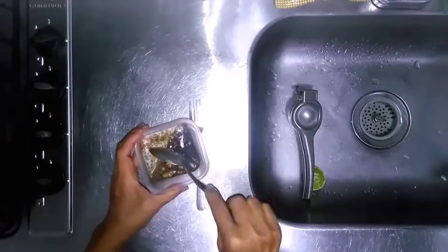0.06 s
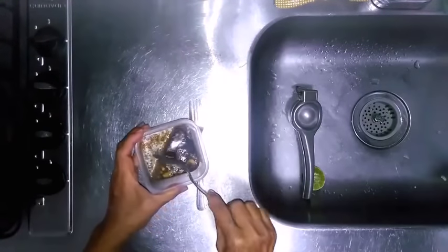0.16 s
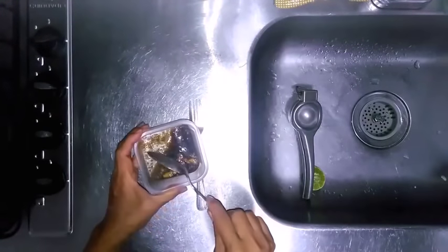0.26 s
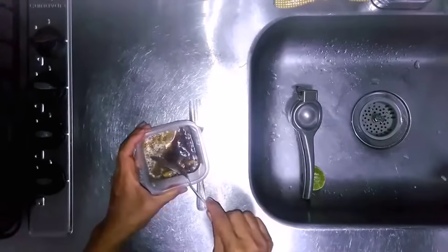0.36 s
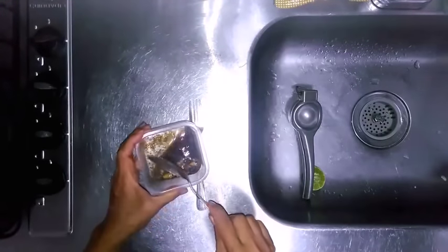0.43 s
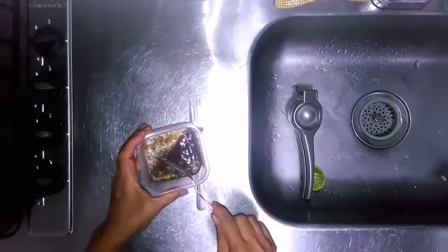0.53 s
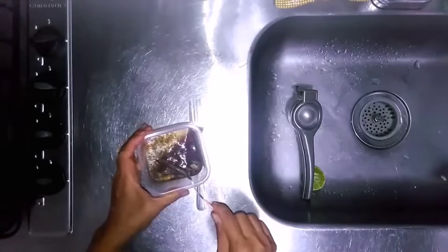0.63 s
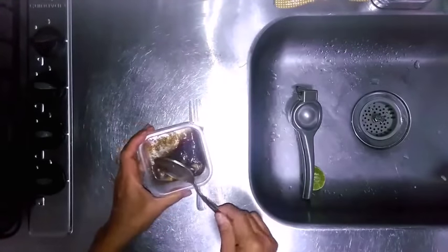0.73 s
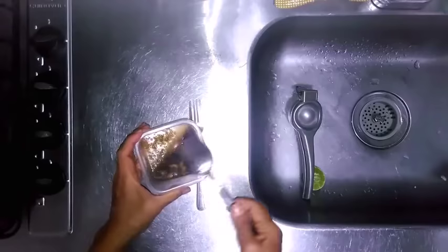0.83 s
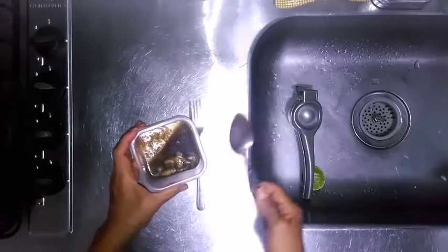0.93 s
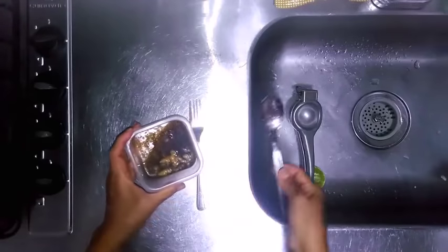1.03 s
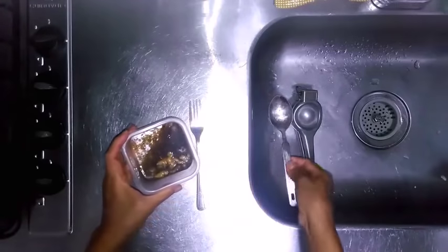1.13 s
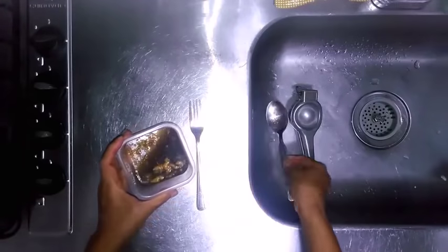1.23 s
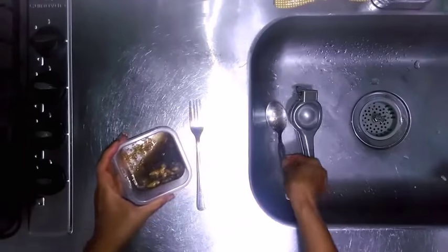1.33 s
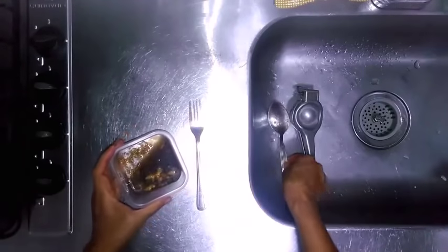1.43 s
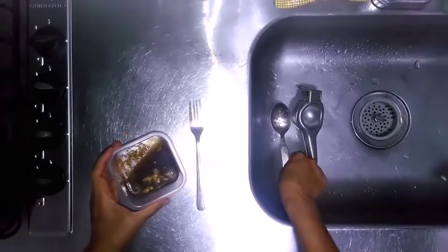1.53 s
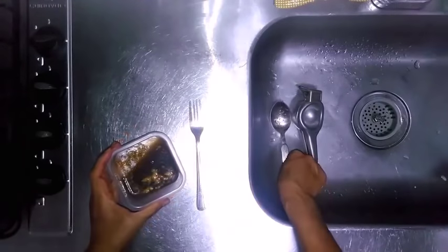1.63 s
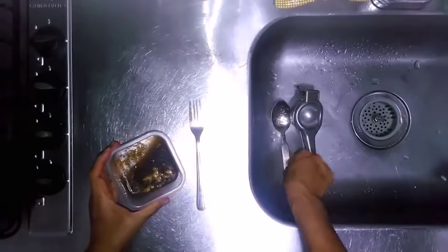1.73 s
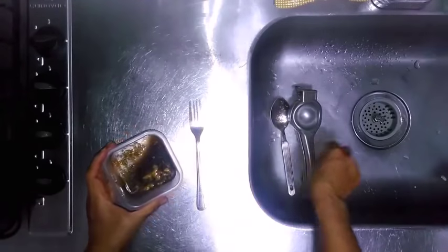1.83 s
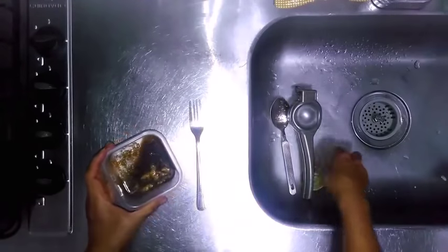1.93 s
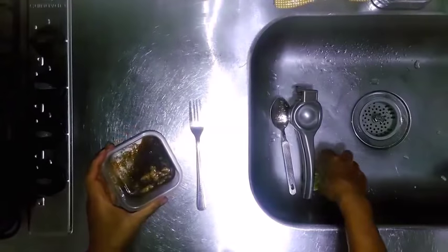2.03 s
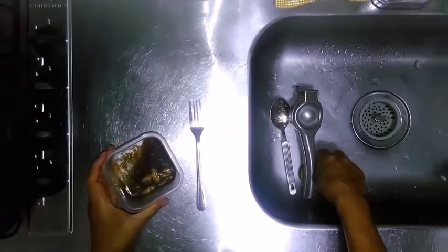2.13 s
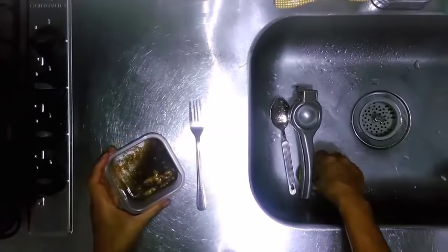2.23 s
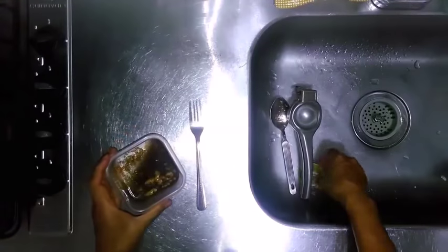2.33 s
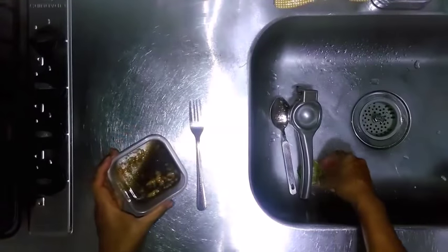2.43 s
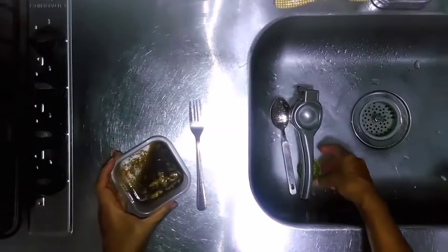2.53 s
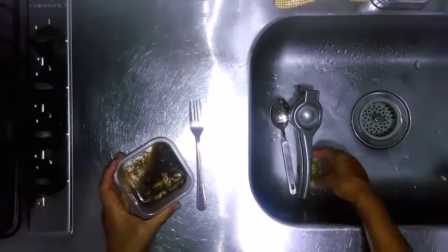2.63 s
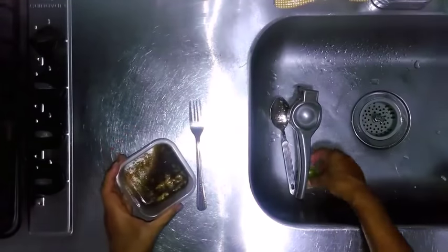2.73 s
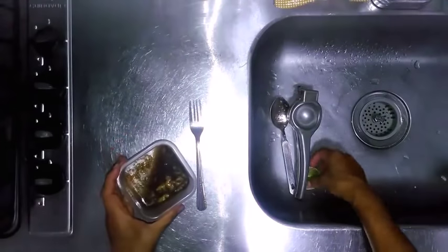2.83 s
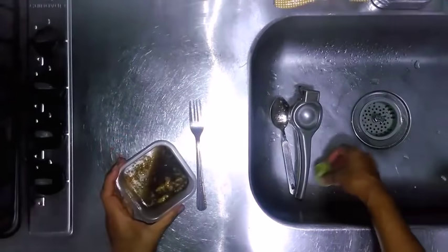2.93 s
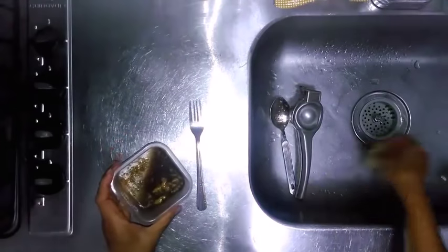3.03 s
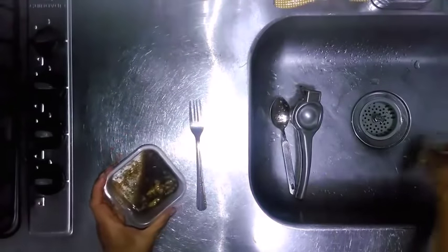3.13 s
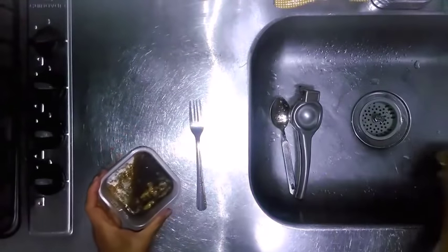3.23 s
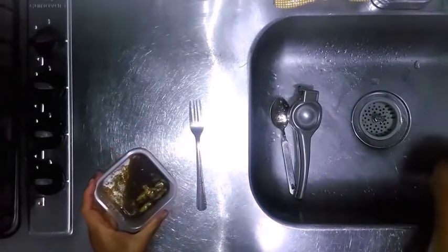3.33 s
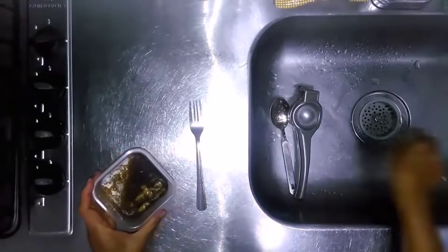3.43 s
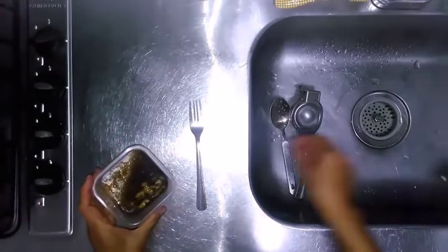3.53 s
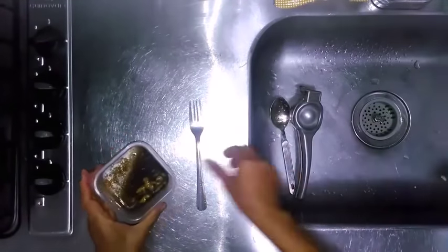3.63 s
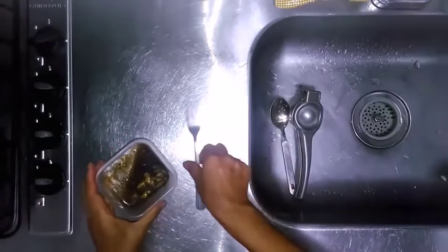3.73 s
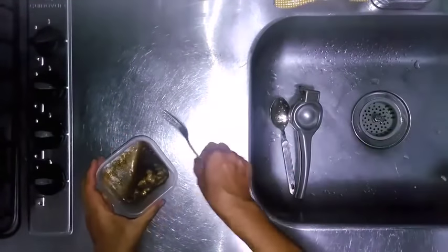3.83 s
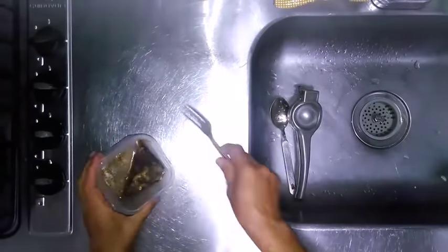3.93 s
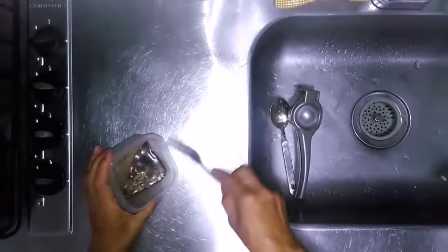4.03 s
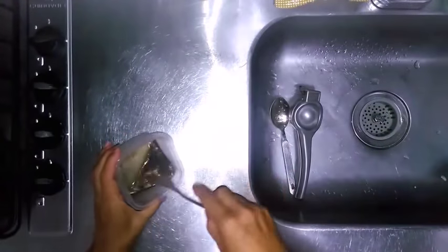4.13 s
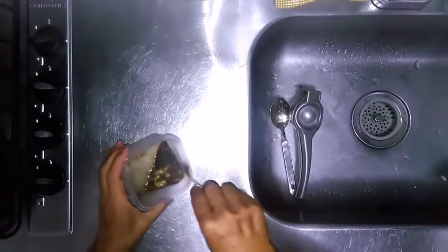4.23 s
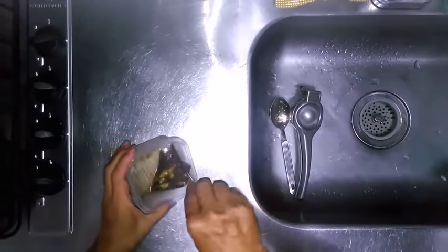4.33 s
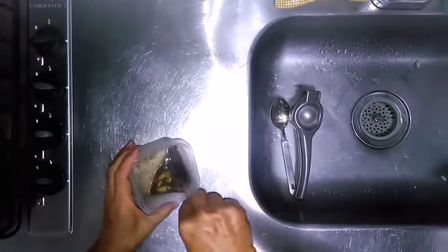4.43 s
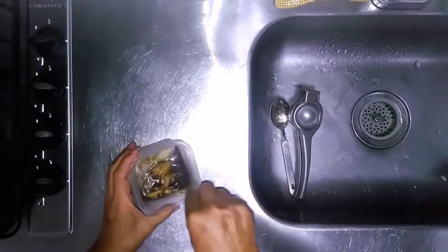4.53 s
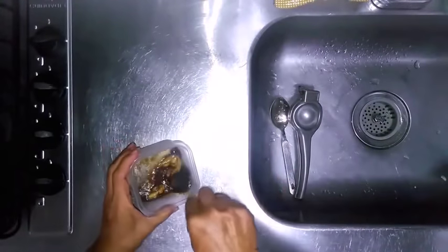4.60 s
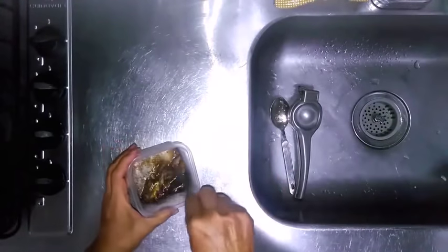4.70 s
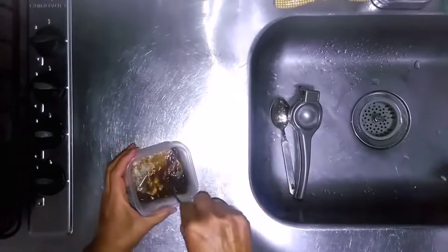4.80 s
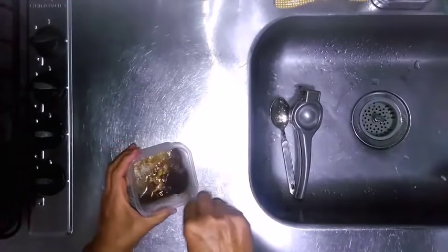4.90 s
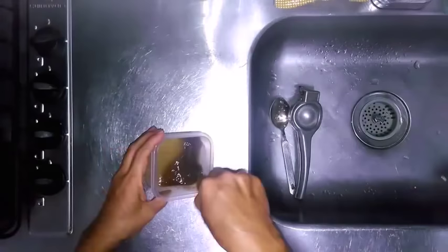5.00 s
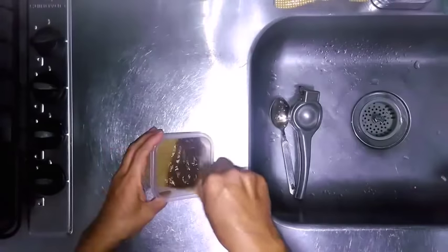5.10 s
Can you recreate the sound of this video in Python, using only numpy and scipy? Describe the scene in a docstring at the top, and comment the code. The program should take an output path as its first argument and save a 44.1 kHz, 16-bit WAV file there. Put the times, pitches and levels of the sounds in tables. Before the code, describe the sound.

Four taps on plastic, a metal spoon dropping into a sink, soft thuds, and a fork stirring dressing with clicks and wet crackle.

```python
"""Dressing at a steel sink

A spoon is tapped clean on a plastic tub's rim and clatters into the basin. A hand fishes out a lime
rind, bumps the steel and tosses the rind to the sink's far side. A fork rasps off the counter and stirs
the tub with clicks and wet crackle. Each hit or scrape is noise coloured by the body it excites. The
tiled room rings briefly over a low rumble; the microphone's two channels have opposite polarity."""
import sys
import numpy as np
from scipy import signal
from scipy.fft import rfft, irfft, next_fast_len
from scipy.io import wavfile
from scipy.ndimage import uniform_filter1d, map_coordinates

SR = 44100
rng = np.random.default_rng(int(sys.argv[2]) if len(sys.argv) > 2 else 0)


def wav_record(signal):
    """Record a signal, one row per channel, as 16-bit PCM in the file named by sys.argv[1]."""
    frames = np.transpose(np.atleast_2d(signal))
    bounded = np.clip(frames, -1, 1)
    # unit amplitude maps onto the largest positive 16-bit level
    quanta = np.round(bounded * 32767).astype(np.int16)
    wavfile.write(sys.argv[1], SR, quanta)


N = 227497
TIME = np.arange(N) / SR
AFTER = np.arange(SR // 2) / SR  # time since a contact
TOP_HZ = 14500

# Cue levels are relative within each layer.
# spoon on the tub's rim: (time [s], level [dB], chatter t60 [s], tilt [dB/octave], wall ring [dB])
SPOON_TAPS = [(.283, -11, 0.075, 0.7, -6), (.453, -5.5, 0.032, 0.7, 0), (.6175, -2.5, 0.028, 1.0, 4.5),
              (.759, 0, 0.026, 1.57, 3.5)]
# spoon bouncing in the sink: (time [s], level [dB], chatter t60 [s], tilt [dB/octave], floor clank [dB])
SPOON_BOUNCES = [(1.455, -6.5, 0.044, -0.9, 4), (1.471, -8.5, 0.041, -1.4, 6),
                 (1.482, -12.5, 0.033, -3.7, 9), (1.513, -12, 0.048, -2.2, -0.5),
                 (1.524, -18, 0.036, -1.5, 0), (1.617, 3.5, 0.024, -0.12, -17.5),
                 (1.626, -3.5, 0.013, -1, -15.5)]
# hand and squeezer on basin and counter: (time [s], level [dB], chatter t60 [s], tilt [dB/octave])
HAND_BUMPS = [(2.127, -39.5, 0.19, -2.5), (2.222, -41, 0.26, -4.5), (2.32, -50, 0.93, -1.7),
              (2.574, -16.5, 0.11, -2), (2.583, -11, 0.039, -1), (2.735, -47, 0.91, -1),
              (2.905, -42, 0.22, -2.5), (3.775, -46, 0.14, -1.5)]
# rind tumbling into the far side of the sink:
# (time [s], level [dB], chatter t60 [s], tilt [dB/octave], boom [dB])
RIND_THUDS = [(3.320, -18, 0.021, -1, 13), (3.428, -15.5, 0.045, -0.5, -3), (3.447, -22.5, 0.048, 6, -2),
              (3.513, -23, 0.11, 2.5, 7), (3.566, -17, 0.03, 2, -12)]
# fork on the tub's wall: (time [s], level [dB], chatter t60 [s], tilt [dB/octave], wall ring [dB])
FORK_CLICKS = [(4.389, -16.5, 0.04, 0.65, 0), (4.409, -17.5, 0.0098, -4, 5.5), (4.535, -19, 0.021, 14, -12),
               (4.670, -32.5, 0.033, 0.5, -8), (4.704, -30, 0.018, -1.5, -8), (4.730, -35, 0.046, 15, -6),
               (4.757, -12, 0.019, 0, 1), (4.764, -14, 0.013, 0, 5), (4.992, -34, 0.022, -0.5, -4),
               (5.038, -18.5, 0.041, -0.5, -10)]
# cutlery dragged through the dressing: (start [s], rise [s], fall [s], level [dB], swell [dB])
STIR_STROKES = [(0, 0.0051, 0.02, -53, 1), (4.515, 0.05, 0.012, -26.5, 9.5),
                (4.665, 0.099, 0.026, -28.5, 16), (4.876, 0.0072, 0.06, -39.5, 7),
                (4.96, 0.028, 0.022, -39.5, -2.5), (5.106, 0.0063, 0.02, -30.5, 8)]
# cutlery and fingers sliding on steel: (start [s], rise [s], fall [s], level [dB], swell [dB])
SLIDE_STROKES = [(1.848, 0.083, 0.087, -37.5, 8), (1.914, 0.012, 0.0075, -33, 5.5),
                 (2.735, 0.014, 0.13, -55.5, 7.5), (2.89, 0.037, 0.022, -53, 1.5),
                 (3.318, 0.02, 0.1, -62, 8.5), (3.838, 0.04, 0.017, -38, 4.5),
                 (3.924, 0.016, 0.0086, -38, 1)]
# the rumble's fader curve: (time [s], level [dB])
RUMBLE_LEVELS = [(0, -48.5), (.3, -37), (1.25, -50.5), (1.55, -40.5), (2.5, -36.5), (2.8, -41), (3.9, -41),
                 (5.15, -49)]

# tone of each source, as a broad EQ curve: (frequency [Hz], level [dB])
TUB_TONE = [(200, -11.5), (420, -12), (570, -7.5), (740, -10), (950, -9), (1300, -8), (1700, -10),
            (2400, -10), (3600, -11), (8000, -13), (11000, -9.5), (13500, -19)]
SPOON_TONE = [(280, -11), (800, -8), (1300, -9), (2300, -8.5), (4000, -8), (7000, -7.5), (11000, 0.5),
              (13500, -7)]
BASIN_TONE = [(250, -10.5), (430, 0.5), (600, -7.5), (780, -3.5), (1200, -10.5), (2600, -11), (4500, -16),
              (8000, -12), (11000, -4), (13500, -15.5)]
FAR_SINK_TONE = [(170, -5.5), (290, -10.5), (430, -2.5), (560, -4.5), (780, 0), (1100, -6.5), (1700, -10.5),
                 (3500, -21.5), (7000, -27.5), (11000, -24.5), (13500, -38)]
FORK_TONE = [(330, -20), (580, -5), (850, -9.5), (1150, -4), (1500, -9.5), (2000, -14), (3400, -11.5),
             (8000, -12), (11000, -6.5), (13500, -13.5)]
SLIDE_TONE = [(400, -1), (900, -3.5), (1600, -7), (3600, -4), (5000, -4.5), (8000, -2.5), (11000, 1.5),
              (13500, -5.5)]
MOUNT_TONE = [(20, -17), (40, -16.5), (60, -9), (85, -3.5), (120, -17.5), (200, -21), (400, -42.5),
              (1000, -94)]
AIR_TONE = [(30, 16.5), (200, 9.5), (700, 4), (1500, -8), (5000, -16), (11000, -5.5), (14000, -11.5)]

# resonances of each struck body: (frequency [Hz], lift [dB], t60 [s])
TUB_RING = [(600, 2, 0.07), (940, 7, 0.04), (1130, 3, 0.03), (1310, 2, 0.018), (2090, 1, 0.06)]
SPOON_RING = [(2114, 11, 0.27), (2670, 12, 0.097), (3217, 5.4, 0.12), (3750, 5.7, 0.07), (4640, 6, 0.027),
              (6270, 13, 0.055), (10200, 4.5, 0.04), (11630, 5, 0.037), (12035, 9.6, 0.05)]
BASIN_RING = [(446, 6.6, 0.24), (618.4, 13.8, 0.16), (863, 5.1, 0.12), (2380, 3.9, 0.14)]
BASIN_FLOOR_RING = [(1594, 11.5, 0.13), (1700, 4.5, 0.014)]
FAR_SINK_WALL_RING = [(433, 15.1, 0.042), (680, 11.4, 0.11), (1054, 15, 0.18)]
FAR_SINK_BOOM_RING = [(184, 11, 0.14)]

# decay of the tiled room: (frequency [Hz], t60 [s])
ROOM_DECAY = [(200, 0.62), (530, 0.39), (1400, 0.37), (3700, 0.34), (10000, 0.31), (15000, 0.063)]
# stereo image of the direct sound and of the room: (frequency [Hz], left-right likeness [0..1])
DIRECT_LIKENESS = [(100, 0.61), (1200, 0.76), (2600, 0.26), (5000, 0.061), (10000, 0)]
ROOM_LIKENESS = [(100, 0.063), (500, 0.59), (1500, 0.05), (4000, 0.024)]
# imbalance of the microphone ports in diffuse sound: (frequency [Hz], left minus right [dB])
PORT_BALANCE = [(100, 2.5), (600, 2), (1500, -2), (3000, -1), (6000, -2), (8500, -1), (11000, 7.5),
                (14000, 4.5)]


def spoon():
    """Four taps shake the spoon clean; it clatters into the sink, the first blows clanking the floor."""
    tub = body(TUB_TONE, TUB_RING)
    taps = contacts(SPOON_TAPS, tub, wet_db=-4.5, gain_db=-2, rise_s=0.00176, push_db=-0.5)
    steel, floor = body(SPOON_TONE, SPOON_RING), body([(0, 0)], BASIN_FLOOR_RING)
    tone = lambda hz, clank_db: steel(hz) + floor(hz, clank_db)
    clatter = contacts(SPOON_BOUNCES, tone, wet_db=2, gain_db=-2.5, rise_s=0.002335, push_db=-6.5)
    return taps + clatter


def lime():
    """A hand knocks about in the basin; the soft rind lands on its far side in dull, booming thuds."""
    basin = body(BASIN_TONE, BASIN_RING)
    bumps = contacts(HAND_BUMPS, basin, wet_db=-3.5, gain_db=1, rise_s=0.0042, push_db=-31)
    walls, boom = body(FAR_SINK_TONE, FAR_SINK_WALL_RING), body([(0, 0)], FAR_SINK_BOOM_RING)
    tone = lambda hz, boom_db: walls(hz) + boom(hz, boom_db)
    thuds = contacts(RIND_THUDS, tone, wet_db=0, gain_db=2, rise_s=0.00697, push_db=0, push_s=0.00038)
    return bumps + thuds


def fork():
    """Tines click on the tub and scrape through crackling dressing, as the spoon does at the start."""
    tub, pressure = body(FORK_TONE, TUB_RING), strokes(STIR_STROKES)
    clicks = contacts(FORK_CLICKS, tub, wet_db=-2, gain_db=1.5, rise_s=0.00121, push_db=-8.5)
    scrape = friction(lambda hz: tub(hz, ring_db=-3), pressure, patchy_db=3.5, grit_db=1, slip_hz=226.5)
    crackle = amp(-3) * pressure * wet_ticks()
    return clicks + kitchen(scrape + crackle, wet_db=-1.5)


def wet_ticks(per_second=240, pitch_hz=6500, spread=.55, decay_cycles=3, size_db=5):
    """Tiny bubbles and films of dressing burst at random, each a few cycles long; rms 1."""
    count = round(per_second * N / SR)
    when, size, pans = rng.random((count, 3)).T
    pitches = np.minimum(pitch_hz * np.exp(spread * rng.standard_normal(count)), TOP_HZ)
    levels_db = -size_db * np.log(1 - .97 * size)  # many faint, a few loud
    track = np.zeros((2, N))
    for start, db, pan, hz in zip(when * N / SR, levels_db, pans, pitches):
        cycles = hz * AFTER[:SR // 100]
        tick = np.sin(2 * np.pi * cycles) * np.exp(-cycles / decay_cycles)
        add(track, start, amp(db) * np.outer(np.sqrt([pan, 1 - pan]), tick))
    return unit(track)


def slides():
    """Cutlery skates on the steel with a fine bright rasp, its ring held back by the hand."""
    steel = body(SLIDE_TONE, SPOON_RING)
    held = lambda hz: steel(hz, ring_db=-1)
    rasp = friction(held, strokes(SLIDE_STROKES), patchy_db=3, grit_db=0.5, slip_hz=271.8)
    return kitchen(amp(3) * rasp, wet_db=-1)


def contacts(rows, tone, wet_db, gain_db, rise_s, push_db, push_s=.00007):
    """Each hit is a firm push and a burst of chatter, sounding through the body into the room."""
    track = np.zeros((2, N))
    for start, db, chatter_t60, tilt_db, *ring_db in rows:
        force = (1 - np.exp(-AFTER / rise_s)) * amp(-60 * AFTER / chatter_t60)
        chatter = blend(rng.standard_normal((2, len(AFTER))), DIRECT_LIKENESS) * force
        # the push is too slow to hold treble, and moves the whole body as one
        push_age = np.maximum(AFTER - rise_s, 0) / push_s
        push = push_age * np.exp(-push_age)
        drive = chatter + amp(push_db) * np.linalg.norm(force) * push / push.sum()
        # the tilt sets each hit's brightness: harder contacts are brighter
        hit_tone = lambda hz: tone(hz, *ring_db) + tilt_db * np.log2(hz + 500) + low_cut(hz)
        hit = unit(colour(drive, hit_tone))
        gain = amp(db + gain_db) * np.sqrt(np.mean(force ** 2))
        add(track, start, gain * kitchen(hit, wet_db))
    return track


def friction(tone, pressure, patchy_db, grit_db, slip_hz):
    """A rasp that catches and slips; its colour shifts as the point of contact travels."""
    spectra = signal.stft(rng.standard_normal((2, N)), nperseg=512)[2]
    patches = uniform_filter1d(rng.standard_normal(spectra.shape[1:]), size=4, axis=0)  # across pitch
    patches = unit(uniform_filter1d(patches, size=12, axis=1))  # across time
    rasp = signal.istft(spectra * amp(patchy_db * patches), nperseg=512)[1][:, :N]
    gritty = blend(rasp, DIRECT_LIKENESS) * amp(grit_db * wobble(slip_hz))
    return pressure * unit(colour(gritty, lambda hz: tone(hz) + low_cut(hz)))


def strokes(rows, bite_s=.018, release_s=.015):
    """Pressure envelope: each stroke takes hold, moves through its swell and lets go."""
    pressure = np.zeros(N)
    for start, rise_s, fall_s, db, swell_db in rows:
        crest, end = start + rise_s, start + rise_s + fall_s
        touching = np.clip((TIME - start) / bite_s, 0, 1) * np.clip(1 - (TIME - end) / release_s, 0, 1)
        pressure += touching * amp(db - swell_db * np.interp(TIME, [start, crest, end], [1, 0, 1]))
    return pressure


def body(spectrum, modes):
    """A body's EQ, dB against Hz: a broad tone with resonant peaks, which ring_db turns up or down."""
    centre, lift_db, t60 = np.transpose(modes)[:, :, None]
    half_width = np.log(1000) / (2 * np.pi * t60)
    peaks = lambda hz: np.sum(amp(lift_db) ** 2 / (1 + ((hz - centre) / half_width) ** 2), axis=0)
    return lambda hz, ring_db=0: along(spectrum, hz) + 10 * np.log10(1 + amp(ring_db) ** 2 * peaks(hz))


def low_cut(hz, corner_hz=130):
    """Small bodies radiate little bass: dB against Hz."""
    return -10 * np.log10(1 + (corner_hz / (hz + 10)) ** 4)


def kitchen(x, wet_db, build_s=0.0012, early_db=-3, early_t60=0.23):
    """The direct sound, a quick slap from the steel around it, then the tiled room's tail."""
    noise = blend(rng.standard_normal((2, len(AFTER))), ROOM_LIKENESS)
    hz, t, spectra = signal.stft(noise, SR, nperseg=256)
    decay = amp(-60 * t / along(ROOM_DECAY, hz)[:, None])
    tail = signal.istft(spectra * decay, SR, nperseg=256)[1][:, :len(AFTER)]
    slap = 1 + amp(early_db - 60 * AFTER / early_t60)
    tail = tail * (1 - np.exp(-AFTER / build_s)) * slap
    tail = tail / np.linalg.norm(tail[0])
    # sound arriving straight from below sets the two ports further apart than the diffuse room does
    direct = colour(x, lambda hz: np.outer([1, -1], 0.34 * along(PORT_BALANCE, hz)))
    return direct + amp(wet_db) * signal.fftconvolve(x, tail, axes=1)[:, :x.shape[-1]]


def background(wander_db=-1, wander_hz=24):
    """The bed: uneven, nearly mono rumble through the camera's mount, over faint room air."""
    rumble = colour(blend(rng.standard_normal((2, N)), [(100, 0.96)]), lambda hz: along(MOUNT_TONE, hz))
    air = colour(blend(rng.standard_normal((2, N)), ROOM_LIKENESS), lambda hz: along(AIR_TONE, hz))
    rumble_db = np.interp(TIME, *np.transpose(RUMBLE_LEVELS)) + wander_db * wobble(wander_hz)
    return amp(rumble_db) * unit(rumble) + amp(-59) * unit(air)


def colour(x, gain_db):
    """Causal (minimum-phase) EQ; gain_db gives dB against Hz."""
    n = x.shape[-1]
    m = 2 * next_fast_len(n)
    cepstrum = irfft(np.log(amp(gain_db(np.fft.rfftfreq(m, 1 / SR)))), m)
    cepstrum[..., 1:m // 2] *= 2
    cepstrum[..., m // 2 + 1:] = 0
    return irfft(rfft(x, m) * np.exp(rfft(cepstrum)), m)[..., :n]


def blend(pair, likeness):
    """Stereo width: two unrelated signals become left and right with the given likeness."""
    n = pair.shape[-1]
    m = next_fast_len(n)
    angle = np.arccos(np.clip(along(likeness, np.fft.rfftfreq(m, 1 / SR)), -1, 1)) / 2
    mid, side = irfft(rfft(pair, m) * [np.cos(angle), np.sin(angle)], m)[:, :n]
    return np.array([mid + side, mid - side])


def wobble(rate):
    """A smooth random curve, rate knots a second."""
    return map_coordinates(rng.standard_normal(N // 20), [TIME * rate], mode="wrap")


def along(points, hz):
    """Read a curve of (Hz, value) points on a log frequency axis."""
    knots_hz, values = np.transpose(points)
    return np.interp(np.log(hz + 1), np.log(knots_hz + 1), values)


def amp(db):
    """Decibels to gain."""
    return 10 ** (np.asarray(db) / 20)


def unit(x):
    """Scale to rms 1."""
    return x / np.sqrt(np.mean(x ** 2) + 1e-20)


def add(track, start_s, x):
    """Mix x into the track from start_s."""
    part = track[:, round(start_s * SR):][:, :x.shape[-1]]
    part += x[:, :part.shape[-1]]


def scene():
    """The full mix at the sink; the level dips briefly during the last stir."""
    dip_s, half_width_s, dip_db = 5.085, 0.014, -15
    dip = amp(dip_db * np.exp(-((TIME - dip_s) / half_width_s) ** 2))
    return (spoon() + lime() + slides() + fork() + background()) * dip


def record(dry):
    """The left port has a treble resonance, the right is inverted; peaks round off, the top is cut."""
    m = next_fast_len(N + SR // 2)
    hz = np.fft.rfftfreq(m, 1 / SR)
    balance = amp(along(PORT_BALANCE, hz))
    ports = np.array([balance, -np.ones_like(hz)]) * np.sqrt(2 / (1 + balance ** 2))
    high_cut = 1 / (1 + (hz / TOP_HZ) ** 90)
    heard = irfft(rfft(dry, m) * ports, m)
    soft_clipped = heard / (1 + (heard / .85) ** 6) ** (1 / 6)
    return irfft(rfft(soft_clipped) * high_cut, m)[:, :N]


dry = scene()
out = record(dry)
wav_record(out)
```